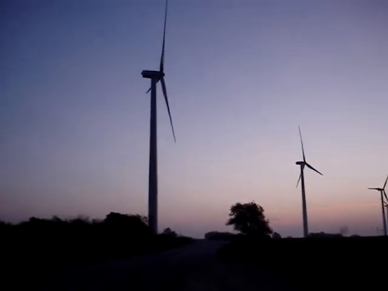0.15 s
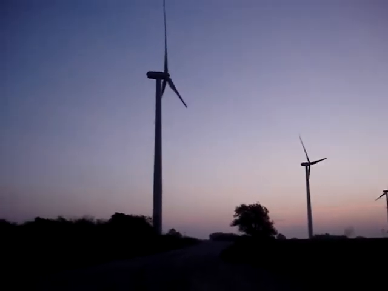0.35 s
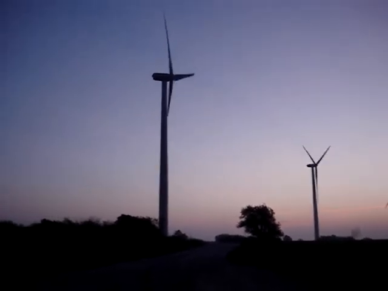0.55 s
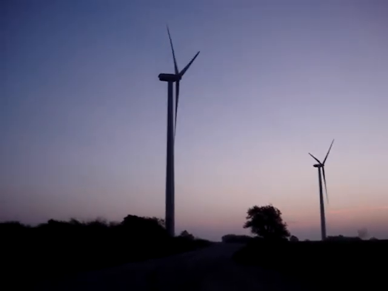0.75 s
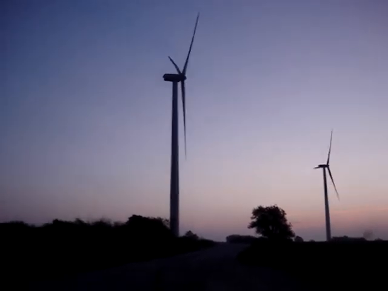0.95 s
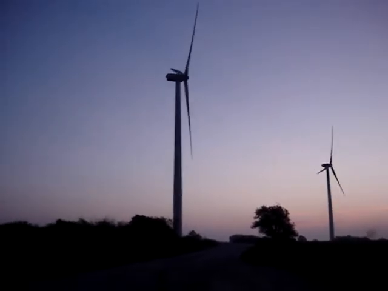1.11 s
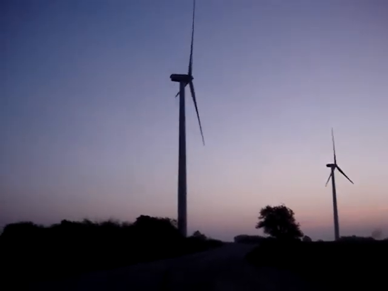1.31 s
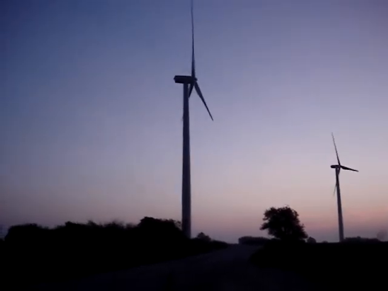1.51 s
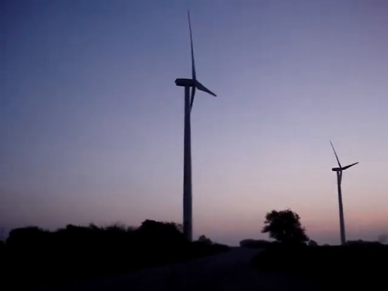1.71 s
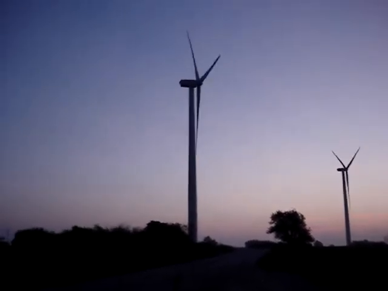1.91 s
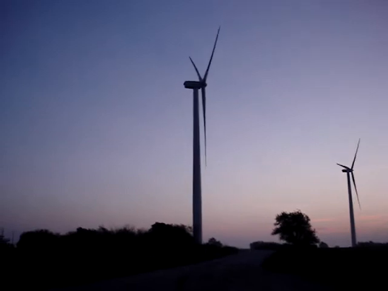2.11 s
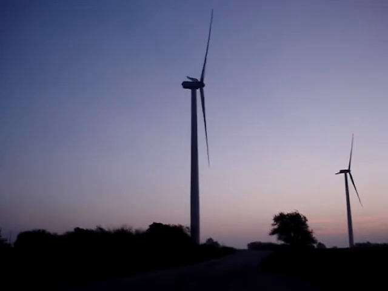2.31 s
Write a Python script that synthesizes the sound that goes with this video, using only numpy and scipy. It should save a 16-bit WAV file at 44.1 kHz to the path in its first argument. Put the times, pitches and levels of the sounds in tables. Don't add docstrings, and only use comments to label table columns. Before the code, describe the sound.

Gusty wind buffets a small camera microphone in an open field, low fluttering puffs growing into harder thumps and pops, one overloading bump midway, then easing to the soft distant roar of wind turbines.

```python
import sys
import numpy as np
from scipy import signal
from scipy.io import wavfile
from scipy.ndimage import uniform_filter1d

SR = 44100
rng = np.random.default_rng(int(sys.argv[2]) if len(sys.argv) > 2 else 0)


def decibels_to_gain(level_db):
    exponent = np.asarray(level_db, float) / 20
    return 10 ** exponent


def file_out(sig):
    cols = np.atleast_2d(sig).T
    lim = np.clip(cols, -1, 1)
    pcm = np.round(lim * 32767).astype(np.int16)
    wavfile.write(sys.argv[1], SR, pcm)


N = 103635

# t/s, peak level/dB, direction (+-1), width/ms
POPS = [(0.5616, -9, 1, 0.91), (0.7243, -11.5, -1, 0.66), (0.7938, -11.5, -1, 0.77),
        (0.9042, -9.5, -1, 0.83), (0.9758, -13, -1, 0.57), (1.2294, -6.5, 1, 0.91), (1.3112, -6.5, -1, 0.6),
        (1.3275, -9.5, -1, 0.48), (1.3472, -9, -1, 0.95), (1.3531, -6.5, -1, 0.42), (1.6248, -9.5, 1, 0.53),
        (1.6317, -11.5, -1, 2.6), (1.6536, -12, -1, 0.44), (1.6601, -9, -1, 0.55), (1.6647, -8, 1, 1.3),
        (1.6817, -3, -1, 0.4), (1.6899, -6, 1, 1.44), (1.6945, -3.5, 1, 0.51), (1.7554, -8, 1, 0.76),
        (1.7827, -6.5, -1, 0.85)]
BUMP_S = 1.3208


def evened(x):
    return x / np.sqrt(np.mean(x ** 2) + 1e-20)


def add(mix, centre_s, sound):
    at = round(centre_s * SR) - len(sound) // 2
    part = mix[max(at, 0):at + len(sound)]
    part += sound[max(-at, 0):][:len(part)]


def band(x, low_hz, high_hz, order=2):
    return signal.sosfilt(signal.butter(order, [low_hz, high_hz], "bandpass", fs=SR, output="sos"), x)


def hump(t_s, centre_s, length_s):
    return np.exp(-(2 * (t_s - centre_s) / length_s) ** 2)


def roar():
    # f/Hz, density/dB per Hz
    roar_spectrum = [(30, 1.5), (150, 3.5), (700, -2), (1300, -13), (1900, -18), (2650, -18.5), (3300, -25),
                     (10100, -35)]
    # t/s, level/dB
    blade_swell = [
        (0, -1),
        (.5, .5),
        (1.0, -0.2),
        (1.45, -0.6),
        (1.7, 0.9),
        (2.0, -0.2),
        (2.35, -0.8),
    ]
    level_db, top_hz = -36.5, 10100
    patchy_db, flicker_db = .8, .5

    frames, hz = N // 128 + 5, np.fft.rfftfreq(512, 1 / SR)
    real, imag, patches = rng.standard_normal((frames, 257, 3)).T
    patches = uniform_filter1d(patches, size=8, axis=0)
    patches = evened(uniform_filter1d(patches, size=16, axis=1))
    flicker = evened(uniform_filter1d(rng.standard_normal(frames), size=5))

    f, db = np.transpose(roar_spectrum)
    field_db = np.interp(np.log(hz + 1), np.log(f + 1), db)[:, None]
    field_db = field_db + patchy_db * patches + flicker_db * flicker
    spectra = (real + 1j * imag) * decibels_to_gain(field_db) * (hz < top_hz)[:, None]
    wash = evened(signal.istft(spectra, nperseg=512, noverlap=384)[1][:N])
    swell_db = np.interp(np.arange(N) / SR, *np.transpose(blade_swell))
    return decibels_to_gain(level_db + swell_db) * wash


def whine():
    # f/Hz, level/dB
    whine_tones = [(1868, -71), (2132, -67), (5173, -83), (8000, -80), (8032, -80)]
    waver_db = 2.5
    t, out = np.arange(N) / SR, np.zeros(N)
    all_knots = rng.standard_normal((len(whine_tones), 12))
    for (hz, db), knots in zip(whine_tones, all_knots):
        waver = np.interp(t, np.linspace(0, N / SR, len(knots)), knots)
        out += np.sqrt(2) * decibels_to_gain(db + waver_db * waver) * np.sin(2 * np.pi * hz * t)
    return out


def buffets():
    # centre/s, length/s, level/dB, pitch/Hz
    eddy_bursts = [(0.046, 0.014, -34, 315), (0.246, 0.018, -24, 270), (0.274, 0.012, -23.5, 326),
                   (0.297, 0.018, -29, 212), (0.325, 0.017, -40, 330), (0.41, 0.034, -30, 240),
                   (0.457, 0.024, -17.5, 281), (0.484, 0.021, -29, 290), (0.533, 0.019, -24.5, 297),
                   (0.561, 0.011, -16.5, 373), (0.598, 0.032, -25.5, 243), (0.645, 0.041, -21, 215),
                   (0.668, 0.029, -20, 222), (0.699, 0.036, -17, 248), (0.722, 0.015, -21.5, 304),
                   (0.748, 0.018, -25.5, 262), (0.794, 0.03, -19, 276), (0.843, 0.016, -26, 249),
                   (0.89, 0.012, -44, 317), (0.901, 0.016, -18, 260), (0.922, 0.0071, -25, 340),
                   (0.94, 0.024, -26, 298), (0.964, 0.028, -17.5, 354), (1.02, 0.0086, -32, 300),
                   (1.057, 0.019, -25.5, 213), (1.089, 0.017, -31, 217), (1.126, 0.028, -27, 235),
                   (1.169, 0.018, -20.5, 205), (1.194, 0.014, -19, 313), (1.214, 0.0047, -16, 370),
                   (1.245, 0.035, -15.5, 255), (1.289, 0.0043, -15, 333), (1.317, 0.026, -13, 421),
                   (1.354, 0.014, -15.5, 310), (1.448, 0.024, -29.5, 314), (1.5, 0.019, -20, 308),
                   (1.524, 0.017, -24.5, 278), (1.577, 0.016, -23.5, 250), (1.627, 0.028, -15.5, 318),
                   (1.652, 0.036, -14.5, 283), (1.689, 0.031, -15.5, 380), (1.757, 0.02, -19, 300),
                   (1.782, 0.022, -22, 353), (1.815, 0.023, -28.5, 283), (1.845, 0.01, -24, 243),
                   (1.9, 0.016, -26, 250), (1.919, 0.016, -32.5, 340), (1.978, 0.0065, -22.5, 367),
                   (2.014, 0.027, -29, 277), (2.072, 0.034, -30, 250), (2.111, 0.047, -40, 356),
                   (2.25, 0.0088, -41, 216), (2.271, 0.025, -31.5, 194), (2.345, 0.015, -35, 290)]
    eddies_per_s, shorten, cycles = 350, .85, .85
    pitch_spread, size_spread_db = .44, 3.0
    tilt = .61
    steepen = .36

    rows = np.array(eddy_bursts)
    draws = rng.standard_normal((len(rows), 4, 24))
    t, out, power = np.arange(-4096, 4096) / SR, np.zeros(N), np.zeros(N)
    for (centre_s, length_s, db, pitch_hz), (place, tone, size, turn) in zip(rows, draws):
        slots_s = (np.arange(-12, 12) + .5 + .3 * place) / eddies_per_s
        bell = np.exp(-2 * np.log(2) * (slots_s / (shorten * length_s)) ** 2)
        tone = np.clip(tone - bell @ tone / bell.sum(), -1.4, 1.5)
        hz = (pitch_hz * np.exp(pitch_spread * tone))[:, None]
        u = (t - slots_s[:, None]) * hz
        weight = bell * decibels_to_gain(size_spread_db * size) * np.exp(-tilt * pitch_spread * tone)
        phase = 2 * np.pi * u + 2 * turn[:, None]
        wavelets = np.exp(-(u / cycles) ** 2 * 2) * np.cos(phase + steepen * np.cos(phase))
        burst = weight @ wavelets
        burst *= np.sqrt(length_s * SR / np.sum(burst ** 2))
        add(out, centre_s, decibels_to_gain(db) * burst)
        add(power, centre_s, decibels_to_gain(2 * db) * np.exp(-4 * np.log(2) * (t / length_s) ** 2))
    return out, power


def rumble(power):
    level_db, top_hz, smooth_s = -19, 75.6, .09
    lazy = uniform_filter1d(power, round(smooth_s * SR))
    heave = evened(band(rng.standard_normal(N), 24, top_hz))
    return decibels_to_gain(level_db) * np.sqrt(abs(lazy) + 1e-4) * heave


def moan():
    t = np.arange(N) / SR
    return decibels_to_gain(-47.5) * hump(t, centre_s=.068, length_s=.097) * np.sin(2 * np.pi * 1149 * t)


def puff(width_ms):
    rebound, run_up = .5, .3
    u = np.arange(-400, 400) / SR / (width_ms / 1000)
    before = np.exp(-(1.5 * (u + .9)) ** 2)
    after = np.exp(-(1.1 * (u - 1.1)) ** 2)
    return np.exp(-(2 * u) ** 2) - rebound * after - run_up * before


def pops():
    trim_db, min_width_ms = -1, .65
    out = np.zeros(N)
    for centre_s, db, sign, width_ms in POPS:
        add(out, centre_s, np.sign(sign) * decibels_to_gain(db + trim_db) * puff(max(width_ms, min_width_ms)))
    return out


def clearings():
    depth, width_ms = .85, 2.6
    dents, t_ms = np.zeros(N), np.arange(-400, 400) / SR * 1000
    for centre_s in [row[0] for row in POPS] + [BUMP_S]:
        add(dents, centre_s, depth * np.exp(-(t_ms / width_ms) ** 2))
    return 1 - np.minimum(dents, depth)


def bump():
    dent_db, dent_ms = -4, .9
    snap_db, crack_db, edge_ms = -15, -39, .07
    out, t_ms = np.zeros(N), np.arange(-400, 400) / SR * 1000
    add(out, BUMP_S, -decibels_to_gain(dent_db) * puff(dent_ms))
    snap = np.exp(-(t_ms / edge_ms) ** 2 / 2)
    crack = (t_ms >= 0) * np.exp(-abs(t_ms) / edge_ms)
    add(out, BUMP_S - .0003, -decibels_to_gain(snap_db) * snap - decibels_to_gain(crack_db) * crack)
    return out


def swish():
    reference_hz = 6100
    air = evened(band(rng.standard_normal(N), .85 * reference_hz, .91 * reference_hz))
    return decibels_to_gain(-67) * hump(np.arange(N) / SR, centre_s=1.7, length_s=.1) * air


def pitted(x):
    # from/s, to/s
    dropouts = [
        (1.299, 1.316),
        (1.326, 1.334),
    ]
    hole_share, hole_low_hz = .09, 4900
    starved_share, starved_low_hz = .6, 3200

    hz, t, z = signal.stft(x, SR, nperseg=256, noverlap=192)
    cells = rng.random((len(t) // 6 + 1, 33))
    chance = cells.repeat(6, axis=0).repeat(4, axis=1)[:len(t), :len(hz)].T
    starved = sum((t > start) & (t < end) for start, end in dropouts) * (hz > starved_low_hz)[:, None]
    share = np.maximum(hole_share * (hz > hole_low_hz)[:, None], starved_share * starved)
    return signal.istft(z * (chance > share), SR, nperseg=256, noverlap=192)[1][:N]


def scene():
    far = roar() + whine()
    gusts, power = buffets()
    port = band(gusts, 79, 1840, order=3)
    wind = clearings() * port + rumble(power) + pops() + bump()
    return (far + wind + moan() + swish())[None]


def top_cut(x):
    return signal.sosfilt(signal.butter(12, 16000, fs=SR, output="sos"), x)


def record(dry):
    low_cut = signal.butter(2, 60, "highpass", fs=SR, output="sos")
    thin = signal.sosfilt(low_cut, pitted(dry[0])[None])
    return top_cut(thin)


dry = scene()
out = record(dry)
file_out(out)
```